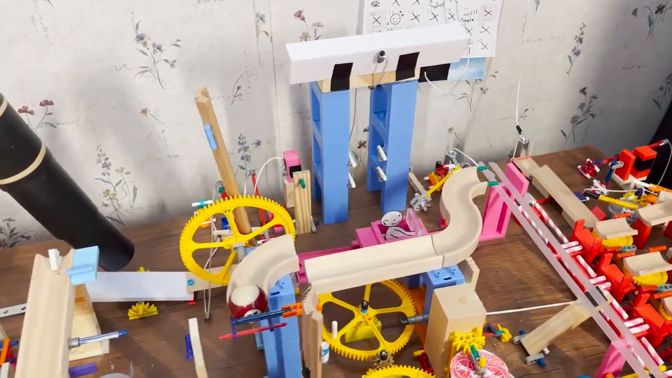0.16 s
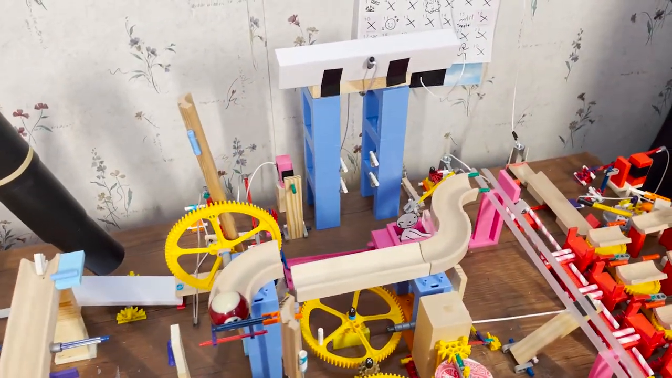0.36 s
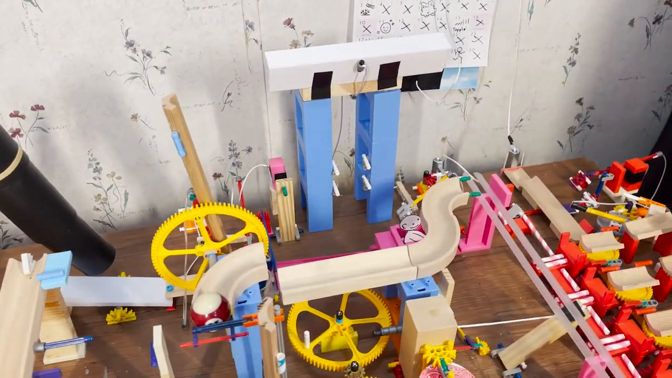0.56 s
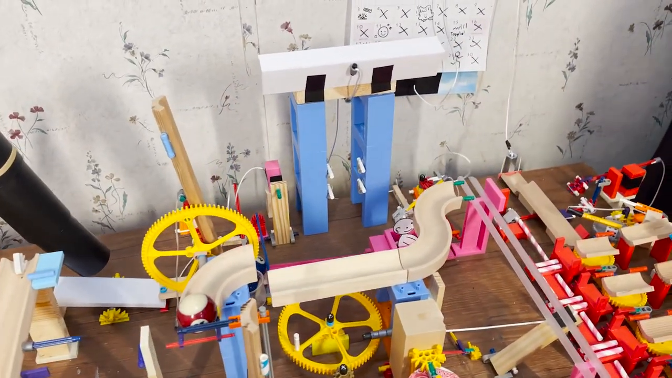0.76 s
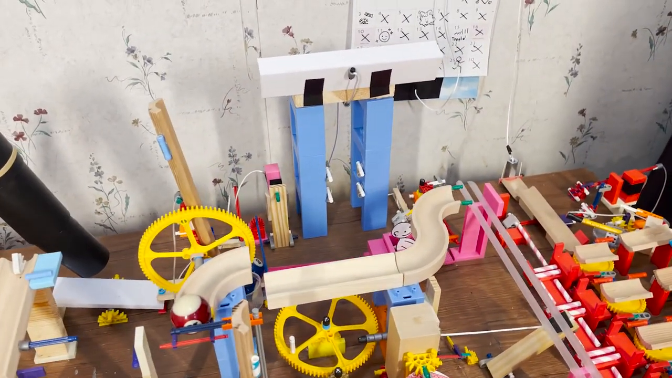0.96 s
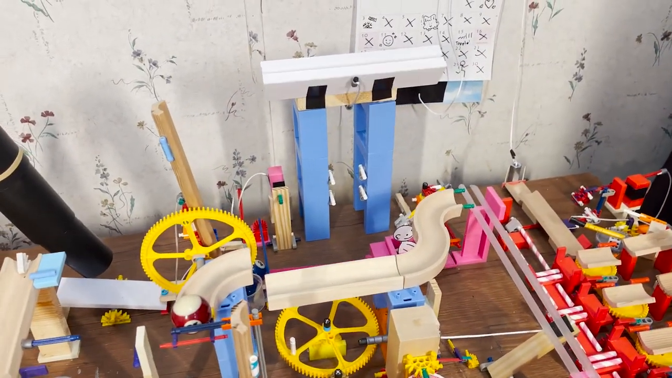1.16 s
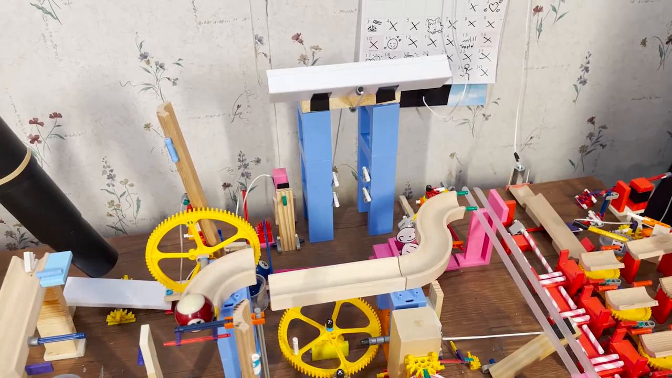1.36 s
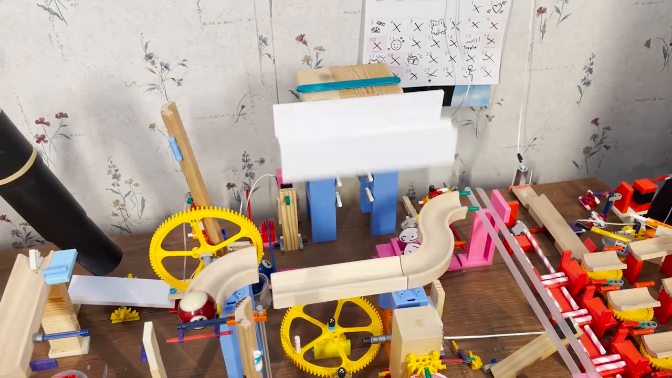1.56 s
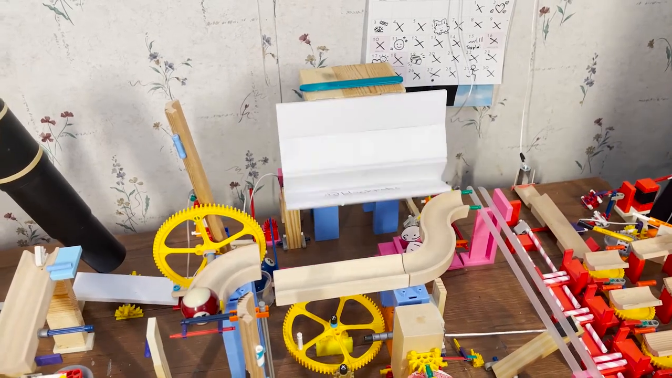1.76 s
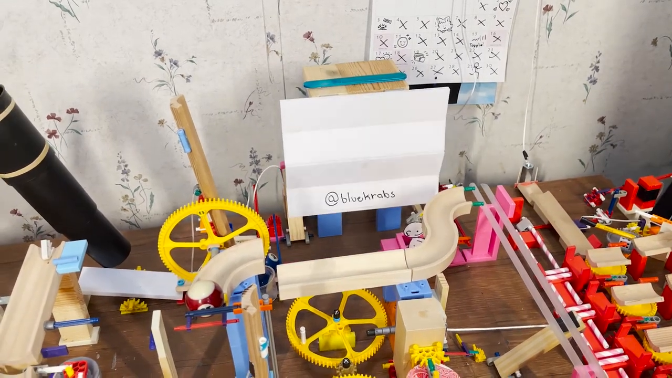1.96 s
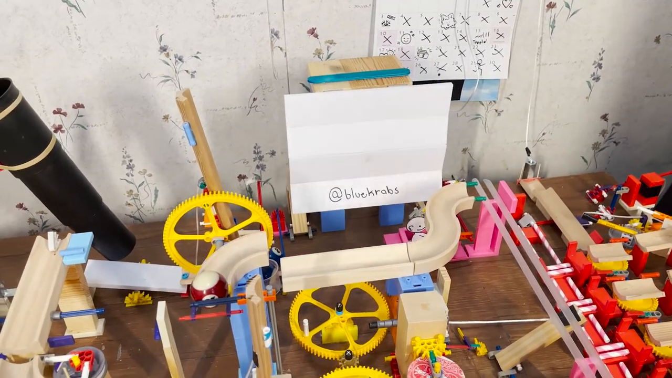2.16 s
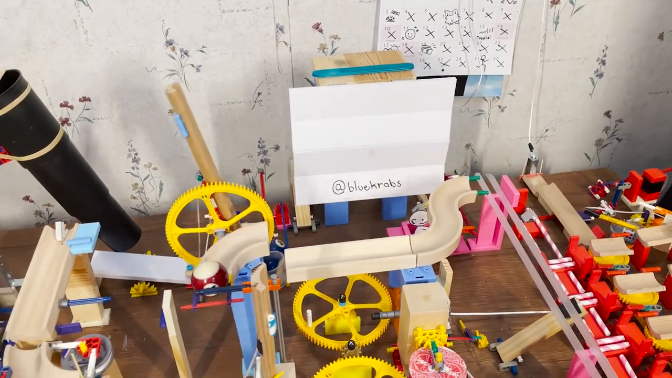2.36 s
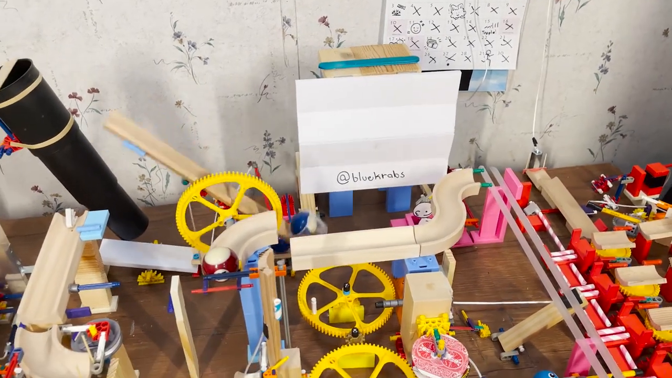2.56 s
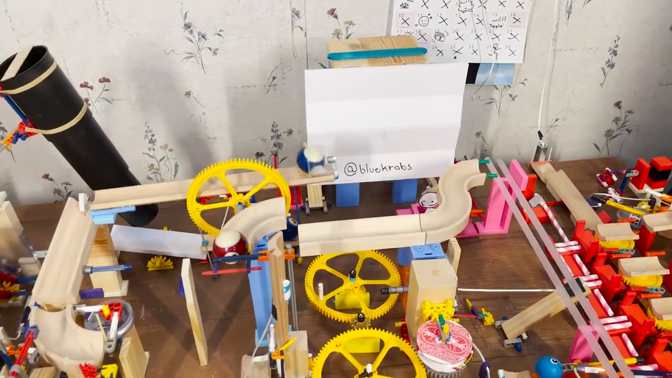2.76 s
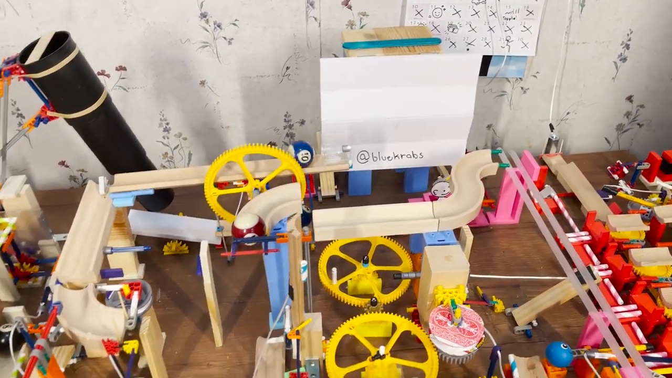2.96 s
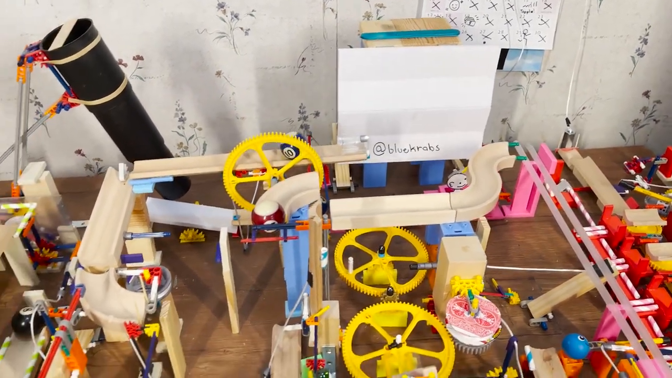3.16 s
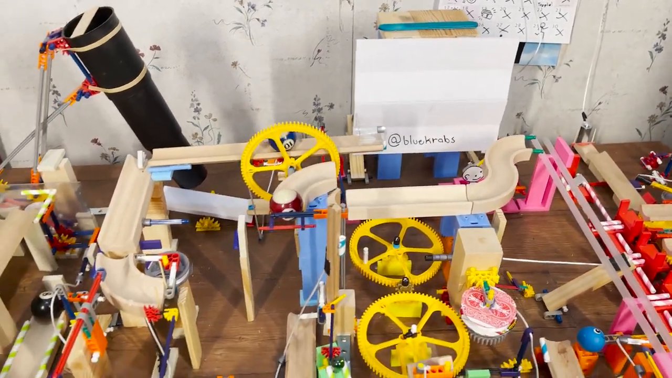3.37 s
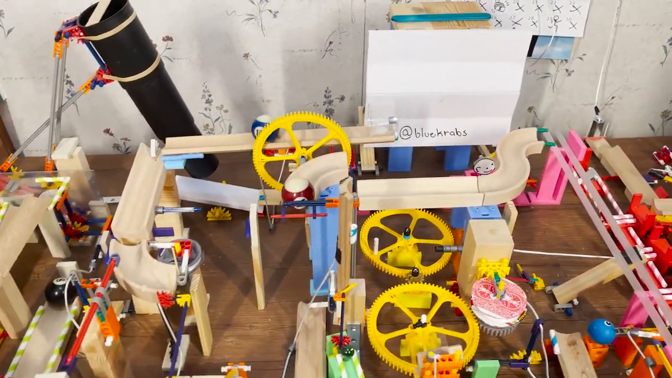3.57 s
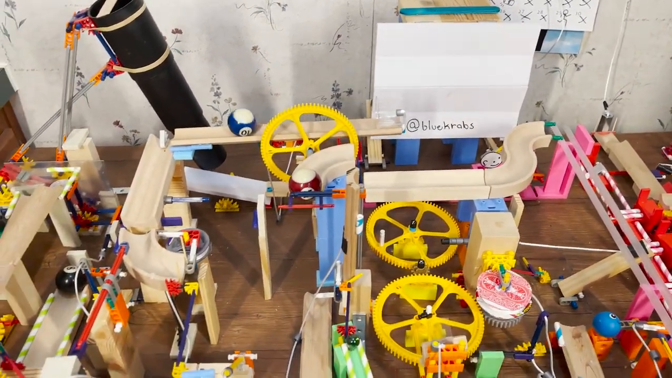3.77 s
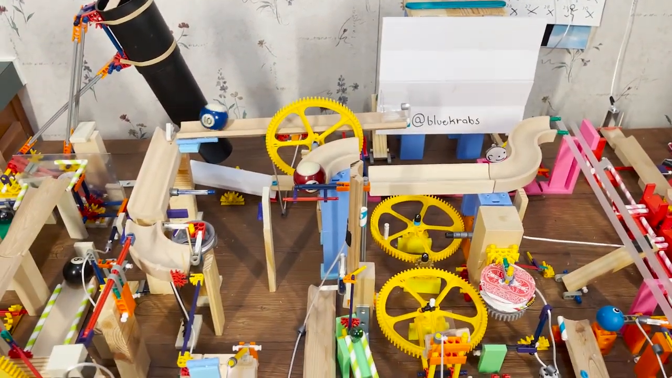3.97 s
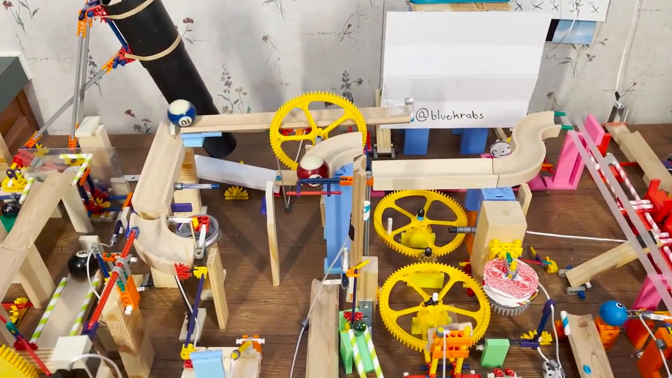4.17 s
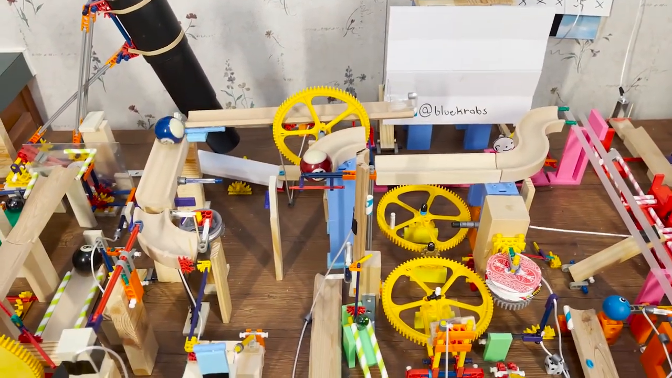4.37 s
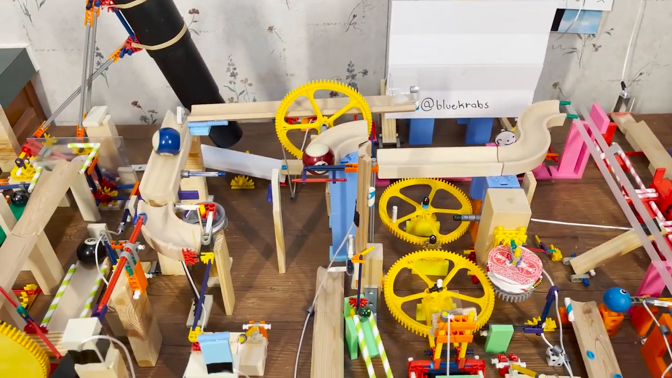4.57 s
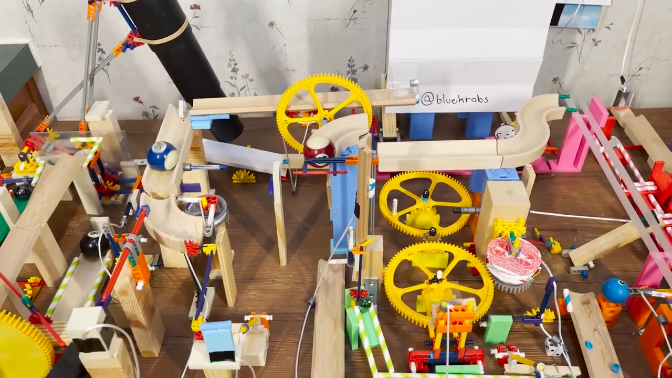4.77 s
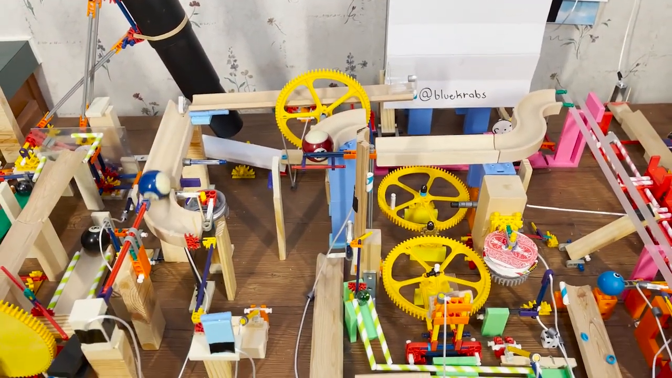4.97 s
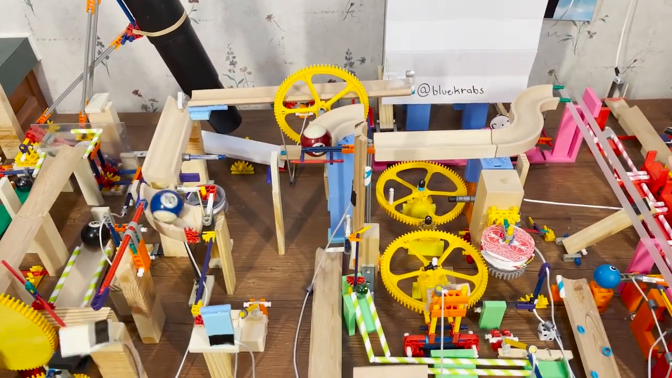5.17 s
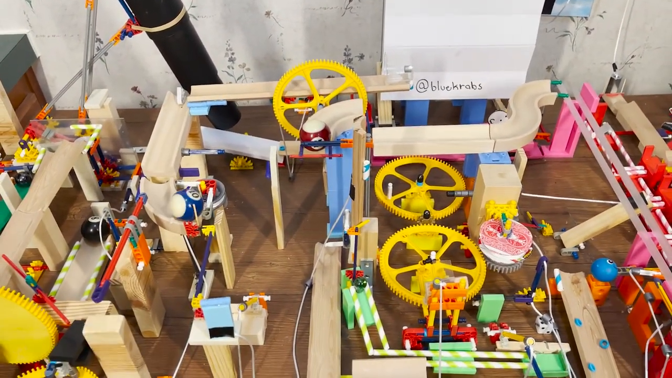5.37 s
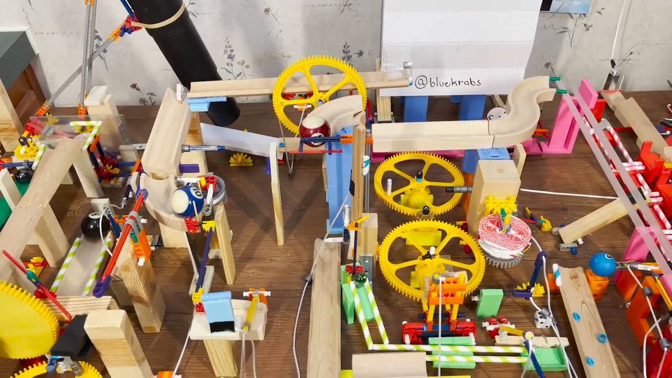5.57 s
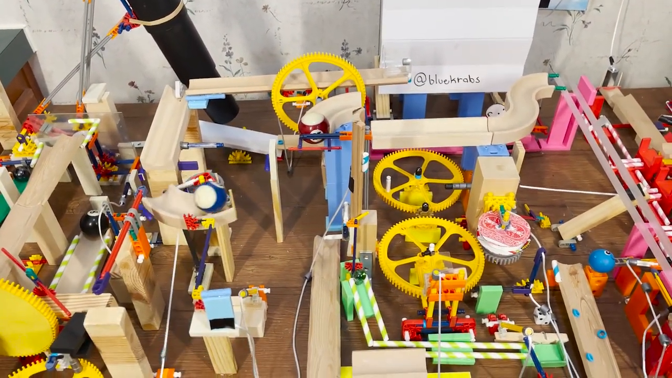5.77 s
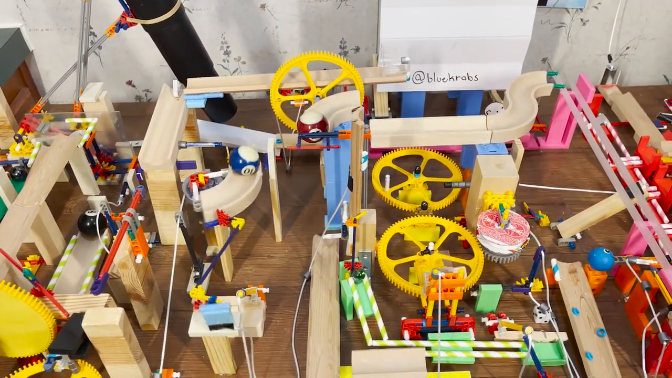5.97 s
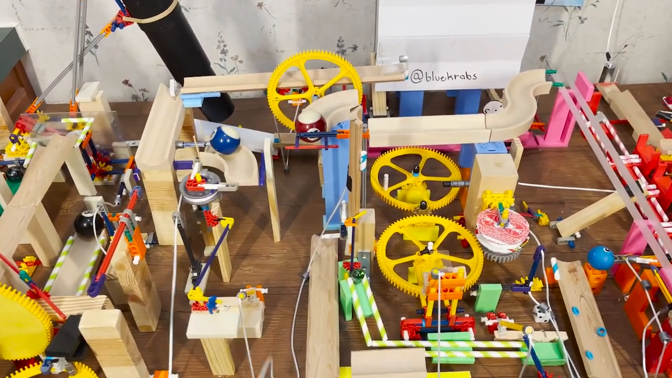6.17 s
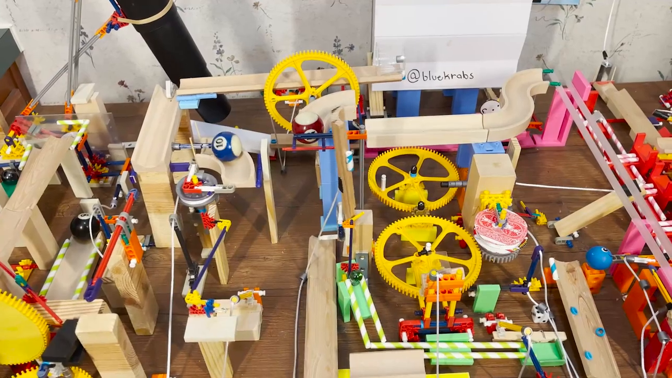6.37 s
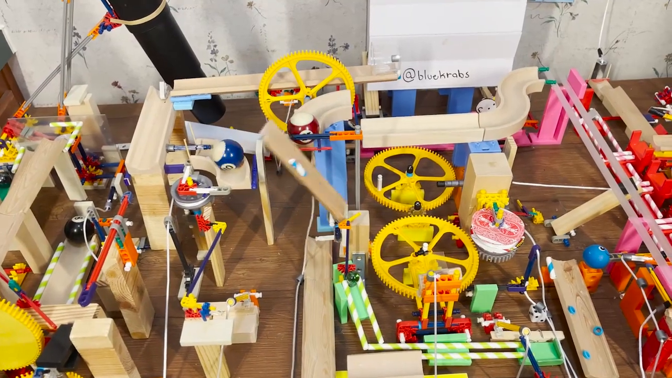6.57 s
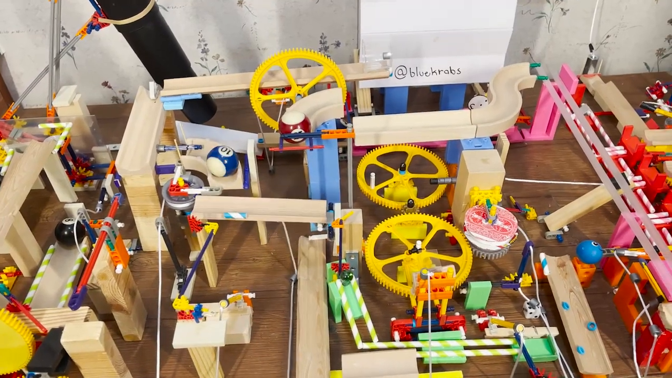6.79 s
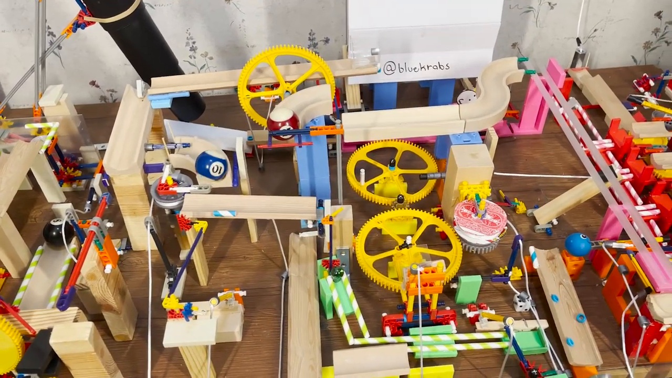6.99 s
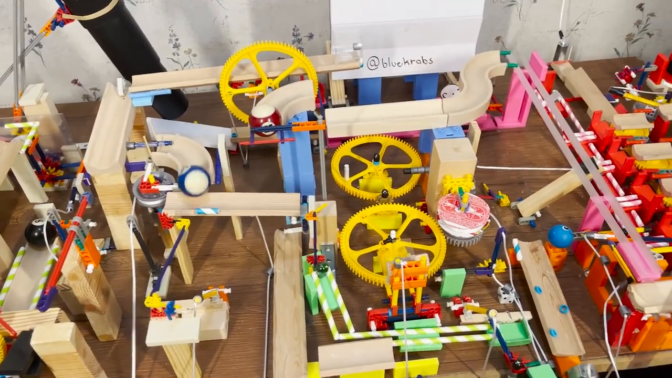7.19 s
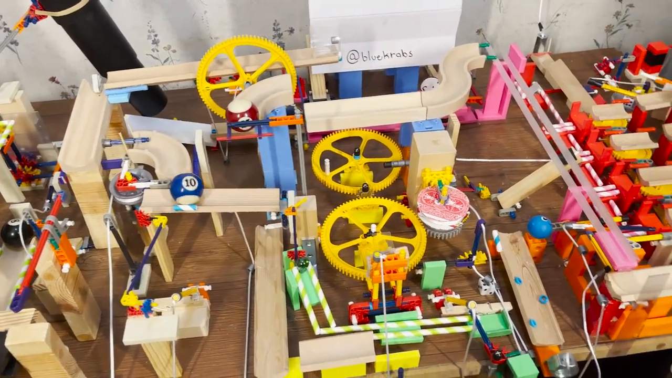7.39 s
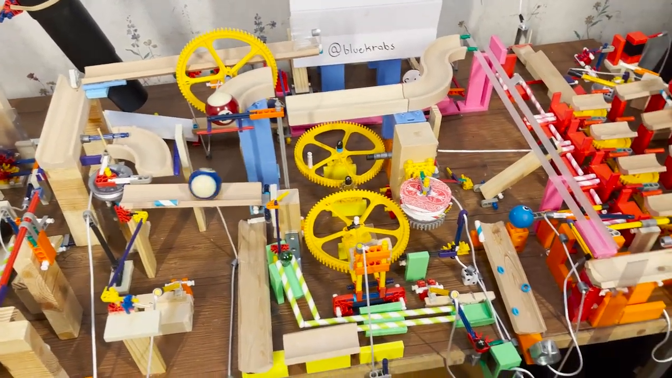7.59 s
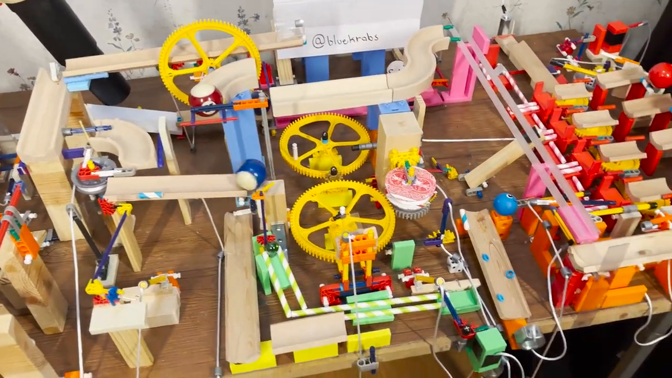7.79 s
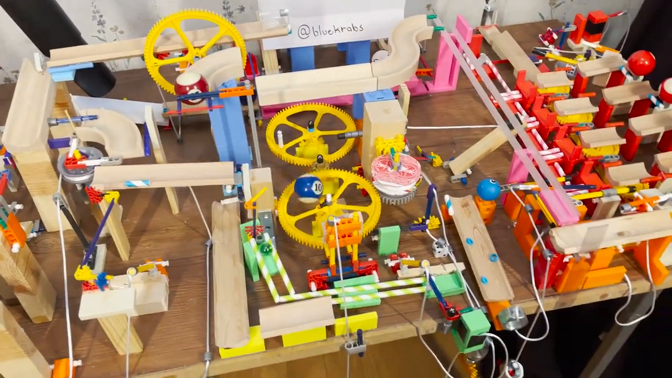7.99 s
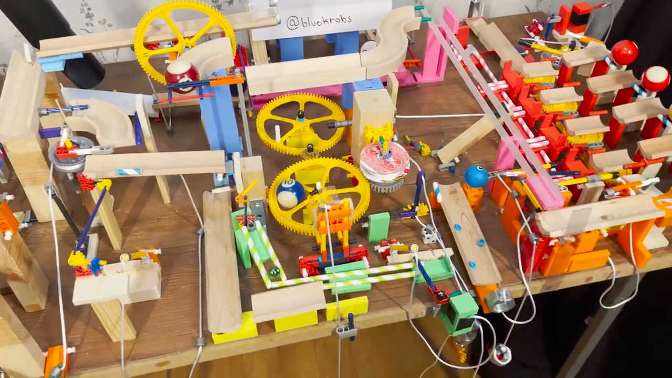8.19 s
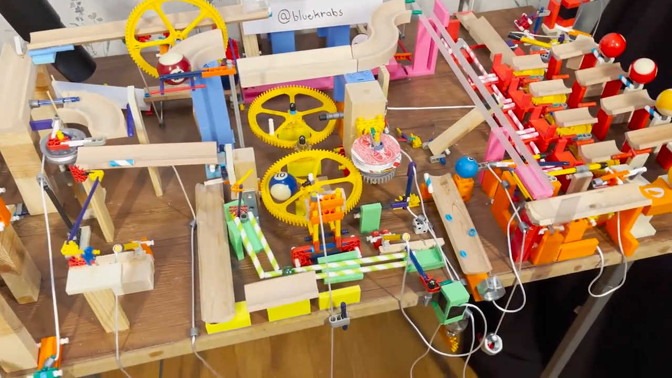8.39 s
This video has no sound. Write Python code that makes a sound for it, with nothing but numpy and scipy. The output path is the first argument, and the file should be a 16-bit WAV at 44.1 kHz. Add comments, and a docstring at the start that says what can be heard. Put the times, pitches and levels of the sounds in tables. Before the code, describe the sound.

A heavy ball rolls along wooden tracks in a tabletop chain-reaction machine, setting off irregular clacks, knocks and scrapes in a quiet room.

```python
"""A chain-reaction machine on a wooden table in a small, quiet room, heard from a hand-held phone.
First a latch clicks and lets a paper banner drop (1.5 s); a small metal part pings. A beam tips over
(2.2 s), then a heavy ball rumbles down wooden tracks (4 s), round a bowl (4.9 s), onto a falling ramp
(6.6 s) and across a plastic gear (7.8 s). Every blow rings its part and shakes the table,
while axles and sliding parts scrape and hiss in between."""
import sys
import numpy as np
from scipy import signal
from scipy.fft import rfft, irfft
from scipy.io import wavfile

SR = 44100
rng = np.random.default_rng(int(sys.argv[2]) if len(sys.argv) > 2 else 0)


def store_pcm(level_fs):
    """Save levels as 16-bit WAV."""
    pcm = np.round(np.clip(level_fs, -1, 1) * 32767).astype(np.int16)
    wavfile.write(sys.argv[1], SR, np.atleast_2d(pcm).T)


N = 372204
TIME = np.arange(N) / SR
BLOW_TIME = np.arange(int(.36 * SR), dtype=np.float32) / SR
BLOW_SAMPLES = .01 * SR  # a blow's level is its energy spread over this span

# borders of the five pitch ranges thump, body, knock, clack and tick: (frequency [Hz])
RANGE_EDGES_HZ = [35, 130, 600, 2200, 7000, 15000]
# the table top's modes, the tones it rings at when struck: (frequency [Hz], level [dB])
TABLE_TOP_MODES = [(41, -15.5), (65, 1), (78, -1.5), (93, 4), (118, -12.5)]


def undb(db):
    """Turn decibels into a gain."""
    return 10 ** (np.asarray(db) / 20)


def unit(x):
    """Scale to an energy of one in each channel."""
    return x / np.sqrt(np.sum(x ** 2, axis=-1, keepdims=True) + 1e-20)


def level(x, db):
    """Scale to an average (rms) level."""
    return unit(x) * np.sqrt(N) * undb(db)


def band(x, lo_hz, hi_hz, order=3):
    """Keep the sound between two frequencies."""
    edges_hz = [lo_hz, min(hi_hz, SR / 2 - 1)]
    return signal.sosfilt(signal.butter(order, edges_hz, "band", fs=SR, output="sos"), x)


def colour(x, points):
    """Shape the tone by points of (frequency [Hz], gain [dB])."""
    hz, db = np.transpose(points)
    bins = np.maximum(np.fft.rfftfreq(N, 1 / SR), 1)
    return irfft(rfft(x) * undb(np.interp(np.log(bins), np.log(hz), db)), N)


def fade(t60_s):
    """A gain that dies away by 60 dB in t60_s seconds."""
    return np.exp(-np.minimum(np.log(1000) * BLOW_TIME / max(t60_s, 1e-3), 40))


def room_air():
    """The still room: faint noise, strongest in the bass."""
    # (frequency [Hz], relative level [dB])
    spectrum = [(25, 5.5), (200, -4), (400, -10.5), (700, -17), (2000, -22.5), (6000, -31), (15000, -37.5)]
    return level(colour(rng.standard_normal((2, N)), spectrum), db=-68.5)


def echoes(count, t60_s, near_db, room_db, near_t60_s=.15, build_s=.00087, right_lag_s=.0003):
    """Stereo paths from several spots: direct sound, echoes off nearby parts, then off the walls."""
    near, walls = rng.standard_normal((2, count, 2, len(BLOW_TIME)), dtype=np.float32)
    build = 1 - np.exp(-BLOW_TIME / build_s)
    paths = undb(near_db) * near * unit(build * fade(near_t60_s))
    paths += undb(room_db) * walls * unit(build ** 2 * fade(t60_s))
    paths[:, 0, 0] += 1
    paths[:, 1, int(right_lag_s * SR)] += 1
    return paths


def bumps(per_s, spread_db):
    """Tiny contacts with the grain of the wood, smeared by the room."""
    contacts = (rng.random(N) < per_s / SR) * rng.standard_normal(N)
    contacts *= undb(spread_db * rng.standard_normal(N))
    path = echoes(count=1, t60_s=.35, near_db=2, room_db=-1)[0]
    return signal.fftconvolve(contacts[None], path, axes=-1)[:, :N]


def wobble(per_s, depth_db):
    """A gain that wanders as the ball meets uneven wood."""
    times = np.arange(0, TIME[-1] + 1, 1 / per_s)
    return undb(depth_db * np.interp(TIME, times, rng.standard_normal(len(times))))


def movement(start, end, first_db, last_db, edge_s=.05):
    """Gain of one steady movement: it sets in, swells or fades evenly, and stops."""
    gate = np.clip(np.minimum(TIME - start, end - TIME) / edge_s + .5, 0, 1)
    return gate * undb(np.interp(TIME, [start, end], [first_db, last_db]))


def rolling_and_sliding():
    """The rolling ball makes the track rumble; axles and sliding parts scrape and hiss."""
    # the ball gains or loses speed: (start [s], end [s], first level [dB], last level [dB])
    runs = [(3.0, 3.445, -58.5, -79), (3.554, 3.88, -64, -73.5), (3.954, 4.287, -62.5, -53.5),
            (4.289, 5.338, -49.5, -52.5), (5.35, 6.152, -51, -71.5), (6.793, 7.306, -75, -70.5),
            (7.58, 7.839, -51, -52), (7.85, 8.46, -50, -64.5)]
    # an axle turns or a part slides:
    # (start [s], end [s], first level [dB], last level [dB], hiss against scrape [dB])
    rubs = [(-.05, 0.52, -65.5, -57.5, -35), (0.972, 1.556, -60, -71.5, -19),
            (2.15, 2.518, -64, -54.5, -12.5), (2.52, 2.779, -55, -45.5, -23.5),
            (2.78, 3.12, -47.5, -73.5, -23.5), (3.995, 4.293, -73, -54, -12.5),
            (4.349, 4.645, -68.5, -68.5, -1.5), (5.5, 6.154, -52, -67, -14), (6.85, 7.113, -58, -65, -12),
            (7.65, 8.46, -58.5, -59.5, -13)]
    # the track's tones under the ball: (frequency [Hz], width [Hz], level [dB])
    track_tones = [(176, 6, 0), (228, 12, -13), (280, 12, -11), (460, 50, -22)]
    roll = sum(movement(*run) for run in runs)
    slide = sum(movement(*rub) for *rub, _ in rubs)
    slide_hiss = sum(movement(*rub) * undb(hiss_db) for *rub, hiss_db in rubs)
    grain = rng.standard_normal(N)  # the wood passing under the ball
    rumble = sum(undb(db) * band(grain, hz - width / 2, hz + width / 2, order=1)
                 for hz, width, db in track_tones)
    rumble = band(rumble, 120, 520, order=2)
    scrape = colour(bumps(per_s=1800, spread_db=4.5),
                    [(300, -23.5), (700, 3.5), (1100, 3), (1900, 1), (4000, -10.5), (7000, -19),
                     (10000, -41)])
    hiss = band(bumps(per_s=2700, spread_db=2.5), 6500, 11500)
    # rolling also scrapes and hisses a little, and sliding rumbles a little
    scrape = level(scrape, -2.5) * np.hypot(slide, undb(-22) * roll)
    hiss = level(hiss, -6.5) * np.hypot(slide_hiss, undb(-36) * roll)
    rumble = level(rumble, -2) * np.hypot(roll, undb(-11.5) * slide)
    return rumble * wobble(per_s=21, depth_db=3) + (scrape + hiss) * wobble(per_s=28, depth_db=5)


def metal_ping(start_s=2.062, hz=7450, db=-57, t60_s=.5):
    """A small metal part sings one thin, fading tone after the banner's last flap."""
    age = np.maximum(TIME - start_s, 0)
    return np.sin(2 * np.pi * hz * age) * np.exp(-np.log(1000) * age / t60_s) * undb(db)


def ring(modes, lo_hz, hi_hz, t60_at_1khz_s=.055, scatter_db=2, detune=.004):
    """A part's clear tones in one pitch range; high ones die sooner, and each blow mixes them anew."""
    out = np.zeros(len(BLOW_TIME))
    for (hz, db), (size, shift, side) in zip(modes, rng.standard_normal((len(modes), 3))):
        if lo_hz <= hz < hi_hz:
            swing = np.sin(float(2 * np.pi * hz * (1 + detune * shift)) * BLOW_TIME)
            tone = unit(swing * fade(t60_at_1khz_s * (1e3 / hz) ** .5))
            out += np.sign(side) * undb(db + scatter_db * size) * tone
    return unit(out)


def timbre(modes, width=.17, valley_db=-14):
    """Gain per frequency of a part's many short-lived tones, which crowd round its clear ones."""
    bins = np.fft.rfftfreq(len(BLOW_TIME), 1 / SR)
    power = sum(undb(db) ** 2 / (1 + ((bins - hz) / (width * hz)) ** 2) for hz, db in modes)
    return np.sqrt((power + undb(valley_db) ** 2) / np.maximum(bins, RANGE_EDGES_HZ[0]))


def crack(gains, t60_s, path):
    """The crowded tones blur into a burst of noise that follows the energy of the echoes."""
    decay = np.exp(-2 * np.log(1000) / (max(t60_s, 1e-3) * SR))
    energy = signal.lfilter([1], [1, -decay], path ** 2)
    noise = irfft(rfft(rng.standard_normal(path.shape)) * gains, len(BLOW_TIME))
    return noise * np.sqrt(energy)


def table_thuds(t60_s=.11, rise_s=.019, modes_db=1.5):
    """A weight shifts or lands; the table top swings up slowly and booms into the room."""
    # (time [s], level [dB])
    thuds = [(0.963, -39), (1.167, -33), (1.354, -44), (1.644, -26), (1.68, -30.5), (1.86, -32.5),
             (2.345, -47), (3.298, -48), (4.245, -41), (6.337, -36.5), (7.321, -38.5), (8.167, -38.5)]
    lo_hz, hi_hz = RANGE_EDGES_HZ[:2]
    paths = unit(echoes(count=len(thuds), t60_s=.35, near_db=-2, room_db=-4.5))
    swell = 1 - np.exp(-BLOW_TIME / rise_s)
    out = np.zeros((2, N + len(BLOW_TIME)))
    for (time_s, db), path in zip(thuds, paths):
        tones = ring(TABLE_TOP_MODES, lo_hz, hi_hz)
        tones = signal.fftconvolve(tones[None], path, axes=-1)[:, :len(BLOW_TIME)]
        noise = unit(band(crack(timbre(TABLE_TOP_MODES), t60_s, path), lo_hz, hi_hz))
        boom = unit((undb(modes_db) * tones + noise) * swell)
        start = int(time_s * SR)
        out[:, start:start + len(BLOW_TIME)] += boom * np.sqrt(BLOW_SAMPLES) * undb(db)
    return out[:, :N]


def struck_parts():
    """The parts in the order the chain reaches them; each rings with tones of its own."""
    # the modes of each part: (frequency [Hz], level [dB])
    latch = [(179, -5), (362, -4.5), (476, -4.5), (789, 2), (1043, -2), (1750, 9), (2764, -5.5),
             (3244, -12), (3844, -4), (10083, 1)]
    banner = [(334, -10), (483, -10.5), (797, -12), (1018, -22.5), (1147, -15.5), (1306, -16.5), (1644, -6),
              (2048, -17), (2309, -21.5), (2590, -5), (4291, -10), (10706, -9)]
    beam = [(182, -8), (278, -10), (331, -3), (548, -25), (921, -3), (1064, 12.5), (1230, 9.5),
            (2391, -8.5), (4444, -4.5), (5111, -22), (5967, -8.5), (11425, -14)]
    track = [(182, 8), (280, 15), (331, -21.5), (483, 16.5), (842, 1), (998, -4), (1159, -21), (1367, 4),
             (2079, 0.5), (3040, 1.5), (4041, -16.5), (10760, -24)]
    bowl = [(179, -1.5), (250, -7.5), (420, -5.5), (703, -2), (1287, -2.5), (1466, -24), (1694, -2),
            (2848, 3.5), (3712, -7), (4985, 6.5), (10390, -2.5)]
    catch = [(176, -4.5), (1142, -19), (1287, -12.5), (2477, 9), (2848, -7.5), (3750, -33), (4742, 8),
             (5762, 4.5), (6496, -11.5)]
    ramp = [(176, -9), (728, -27), (854, -12), (958, 0), (1165, -5.5), (1313, -2.5), (1612, -4.5),
            (3101, 12.5), (3496, 7.5), (4227, 4), (4718, 12.5), (9933, -5)]
    lip = [(331, -12), (854, -0.5), (1018, 5), (1170, -12), (2142, -7), (2391, 6.5), (3040, -8),
           (4227, -18), (4789, 6.5), (10600, -19)]
    gear = [(175, -4), (326, -14), (378, -0.5), (762, 2.5), (898, 6.5), (1033, -7), (1237, -15), (1387, 8),
            (1572, -32), (1853, 8), (2440, -46), (2820, -27)]
    spokes = [(398, -6), (1320, -3), (1480, -3), (2477, 15), (3070, 21.5), (4985, 22), (5648, -7),
              (8134, -19), (9449, -3), (10760, 22)]
    # (start [s], modes, thump passed to the table [dB], extra tick [dB])
    return [(0, latch, 9, -1), (1.5, banner, -1.5, .5), (2.2, beam, -7, -3.5), (4, track, -10, -2),
            (4.9, bowl, 5, 4.5), (6.1, catch, 5, -2.5), (6.6, ramp, -2.5, -.5), (7.1, lip, 8, 2.2),
            (7.8, gear, -1, -7), (7.95, spokes, 3, 9.5)]


def contact(hz, cycles):
    """The struck spot itself swings a few times."""
    return unit(np.sin(2 * np.pi * hz * BLOW_TIME) * fade(cycles / hz))


def blows_in_range(index, gain_db, modes_db, crack_stretch, rise_s, t60_s, near_db, room_db,
                   contact_db=-3, contact_cycles=14, softness=.058):
    """One pitch range of every blow: a noisy crack and clear tones, with their echoes."""
    # (time [s], strength [dB], weight [dB], hardness [dB per octave],
    #  crack fade time before stretching [s], tone of the struck spot [Hz])
    blows = [(0.382, -47.5, -6.5, -3.1, 0.16, 2430), (0.4954, -32.5, -3, -0.8, 0.012, 3280),
             (0.935, -48, 0, -1.3, 0.2, 1820), (0.962, -41.5, -7.0, 3.5, 0.045, 1670),
             (1.137, -43.5, 8, -1.5, 0.018, 1590.0), (1.2267, -42.5, -1.5, 0.2, 0.022, 3200.0),
             (1.53, -55.0, 4.5, 1.7, 0.11, 2510.0), (1.5615, -35.5, 2.0, -7, 0.017, 830),
             (1.5655, -31.0, 4, 0.2, 0.014, 925), (1.614, -14, -8.5, 0.17, 0.053, 2610),
             (1.628, -24.5, -7.0, 1.4, 0.012, 2500.0), (1.644, -20.5, -10.5, 2.0, 0.038, 2100),
             (1.676, -29.5, 0.0, 0.8, 0.084, 2500), (1.8188, -25, -0.5, 2, 0.04, 1660),
             (1.847, -27.0, -4.0, 2.8, 0.13, 2800), (1.8599, -17, -7, -0.15, 0.025, 2420),
             (1.9, -26.0, -1.5, 0.15, 0.024, 5100), (2.0618, -28, -3.5, -3, 0.017, 834),
             (2.2545, -39.5, 1.5, -0.8, 0.016, 1240), (2.267, -37, 1, 1.1, 0.066, 844),
             (2.313, -53.5, 4.0, 1.5, 0.025, 1160.0), (2.346, -54, 4.5, 6.5, 0.15, 1300.0),
             (2.492, -53.5, 4.5, 2.5, 0.053, 1310), (2.578, -45.5, 11.5, -2.5, 0.039, 1210),
             (2.599, -41.5, -1.5, -2.5, 0.052, 1230), (2.731, -42, -9.0, 2.5, 0.067, 3020),
             (2.7651, -18.5, -2.5, 1.56, 0.03, 1000), (2.855, -46.5, 15.0, 0, 0.032, 1030.0),
             (2.891, -34.5, -9, -1, 0.021, 1860), (2.978, -54, 14.0, -2.2, 0.024, 750),
             (3.032, -59.5, 15.5, -8, 0.03, 1070), (3.298, -59.5, 19, 3.5, 0.035, 5985.0),
             (3.505, -72.5, 6.5, -1.2, 0.04, 1300.0), (3.748, -66, 4.5, 3, 0.044, 1790),
             (4.2452, -51, 14, 0.5, 0.017, 3980.0), (4.2902, -14.5, -3.5, -5.5, 0.018, 3880),
             (4.313, -31.5, 2, -10, 0.04, 930.0), (4.416, -36.5, 10, -5, 0.013, 724),
             (4.9718, -34.5, -6.5, -0.7, 0.036, 1750), (4.984, -38.5, 3, 0, 0.013, 5790.0),
             (5.074, -37.5, -14.0, 0.5, 0.066, 4300), (5.083, -42.5, -15, 0.5, 0.0088, 4270),
             (5.164, -49, 5.5, -15, 0.031, 740.0), (5.2717, -47.5, -4, -4.5, 0.024, 885.0),
             (5.3132, -38, -16.5, -6, 0.032, 974), (5.334, -57, -4.0, 6.5, 0.033, 4000.0),
             (5.346, -30.5, 1.5, 2, 0.13, 3630), (5.3953, -28, 2.5, 0, 0.017, 1520),
             (5.629, -52, 5, 4, 0.025, 6410.0), (5.676, -41, 1.5, -0.7, 0.034, 1170),
             (5.7, -48, 1.0, -2, 0.01, 954), (5.8823, -56.5, 1.5, 1.2, 0.014, 6200),
             (5.913, -42.5, -16.5, -1.5, 0.017, 2670), (6.018, -55, -10.0, 0.3, 0.077, 2220.0),
             (6.105, -52.5, -10, 1, 0.036, 3900.0), (6.1161, -35.5, -1.5, 2.8, 0.096, 4700),
             (6.177, -24.5, -11, 1.1, 0.004, 3960), (6.338, -60.5, 17, -6.4, 0.095, 916),
             (6.3935, -53.5, -5.5, -2, 0.016, 866), (6.699, -54.5, -6, 0, 0.064, 2020),
             (6.7125, -22, -8.5, -1.5, 0.031, 3860), (6.7205, -17.0, -10.0, 0.6, 0.054, 4030),
             (7.189, -37.0, -14.5, -0.1, 0.021, 1300), (7.2304, -32.5, -19, -1.8, 0.026, 2150),
             (7.2507, -23.0, -9.5, -0.17, 0.014, 3000.0), (7.3209, -36.5, -4, -0.6, 0.082, 1400),
             (7.5198, -41.5, -4.5, -4.5, 0.029, 837), (7.8355, -16.5, -4.5, -2, 0.018, 1417),
             (7.873, -26.5, -4.0, 0, 0.17, 880), (7.9938, -38, -10, 6, 0.025, 5170),
             (8.002, -25.5, -0.5, 0, 0.043, 5070), (8.0646, -36.0, -10, 2.5, 0.037, 5040),
             (8.1223, -34, -9.0, 1.5, 0.18, 5260), (8.1668, -35.5, -7.5, 3.4, 0.044, 1700),
             (8.274, -35.5, -10.0, -6, 0.022, 2860)]
    pivot_hz = 1150  # a harder contact adds treble above this pitch
    lo_hz, hi_hz = RANGE_EDGES_HZ[index:index + 2]
    octaves = np.log2(np.sqrt(lo_hz * hi_hz) / pivot_hz)
    paths = echoes(13, t60_s, near_db, room_db)  # the blows take turns among 13 spots
    parts = []
    for from_s, own_modes, thump_db, tick_db in struck_parts():
        modes = TABLE_TOP_MODES + own_modes
        parts.append((from_s, modes, timbre(modes), (thump_db, 0, 0, 0, tick_db)[index]))
    out = np.zeros((2, N + len(BLOW_TIME)))
    for k, (time_s, strength_db, weight_db, hardness, crack_s, contact_hz) in enumerate(blows):
        _, modes, gains, part_db = [part for part in parts if part[0] <= time_s][-1]
        db = gain_db + part_db + strength_db
        # weight feeds the low ranges, hardness the high ones
        db += weight_db if hi_hz < pivot_hz else hardness * octaves
        path = unit(paths[k % len(paths)])
        tones = undb(modes_db) * ring(modes, lo_hz, hi_hz)
        if lo_hz <= contact_hz < hi_hz:
            tones += undb(contact_db) * contact(contact_hz, contact_cycles)
            db += 4.5  # the range in which the struck spot rings stands out
        tones = signal.fftconvolve(np.float32(tones[None]), np.float32(path), axes=-1)
        noise = unit(band(crack(gains, crack_stretch * crack_s, path), lo_hz, hi_hz))
        # heavy parts and long, soft contacts take a moment to start swinging
        swell = 1 - np.exp(-BLOW_TIME / (rise_s + softness * crack_s))
        blow = unit((tones[:, :len(BLOW_TIME)] + noise) * swell)
        start = int(time_s * SR)
        out[:, start:start + len(BLOW_TIME)] += blow * np.sqrt(BLOW_SAMPLES) * undb(db)
    return out[:, :N]


def clatter():
    """The parts strike each other; the low ranges carry the weight, swell later and ring longer."""
    thump = blows_in_range(0, gain_db=-16, modes_db=1, crack_stretch=3, rise_s=.021,
                           t60_s=.35, near_db=-2.5, room_db=0)
    body = blows_in_range(1, gain_db=-1, modes_db=-1, crack_stretch=4, rise_s=.002,
                          t60_s=.36, near_db=-2, room_db=-3.5)
    knock = blows_in_range(2, gain_db=.8, modes_db=-6.5, crack_stretch=.7, rise_s=.00014,
                           t60_s=.33, near_db=-1, room_db=-4)
    clack = blows_in_range(3, gain_db=-1.1, modes_db=-8.5, crack_stretch=.5, rise_s=.0001,
                           t60_s=.33, near_db=-1, room_db=-5,
                           contact_db=-2.5, contact_cycles=20, softness=.011)
    tick = blows_in_range(4, gain_db=-8.5, modes_db=-11, crack_stretch=1, rise_s=.0001,
                          t60_s=.3, near_db=-2.5, room_db=-11, softness=.018)
    return thump + body + knock + clack + tick


def scene(right_db=-8):
    """The machine, louder on the left, over the still air of the room."""
    machine = clatter() + table_thuds() + rolling_and_sliding() + metal_ping()
    return machine * undb([[0], [right_db]]) + room_air()


def record(dry, bass_hz=470, treble_hz=8400, top_hz=15900, bass_lag_s=.00043, bass_apart_db=-6):
    """The phone is stereo in the middle range; bass and treble reach both sides nearly alike."""
    # the microphone's tone: (frequency [Hz], gain [dB])
    microphone = [(25, -9.5), (42, -3.5), (85, -0.5), (120, -3), (175, 0.5), (440, 1.5), (630, -4),
                  (950, -1), (3200, 1), (4800, 1.5), (7000, 2.5), (8400, -0.5), (9500, 8), (10900, 3),
                  (12000, 0), (13200, -19.5), (15600, -19)]
    left, right = rfft(colour(dry, microphone))
    hz = np.fft.rfftfreq(N, 1 / SR)
    bass = 1 / (1 + (hz / bass_hz) ** 12)
    treble = 1 - 1 / (1 + (hz / treble_hz) ** 24)
    # the right side gets the left's bass slightly late and its treble slightly early
    treble_lead_s = 11 / SR
    shared = np.sqrt(bass) * np.exp(-2j * np.pi * hz * bass_lag_s)
    shared += np.sqrt(treble) * np.exp(2j * np.pi * hz * treble_lead_s)
    apart = np.sqrt(np.clip(1 - bass - treble, 0, 1) + bass * undb(bass_apart_db) ** 2)
    stereo = irfft(np.array([left, shared * left + apart * right]), N)
    low_pass = signal.ellip(8, .2, 70, top_hz, fs=SR, output="sos")
    return signal.sosfilt(low_pass, np.clip(stereo, -.88, .88))


dry = scene()
out = record(dry)
store_pcm(out)
```